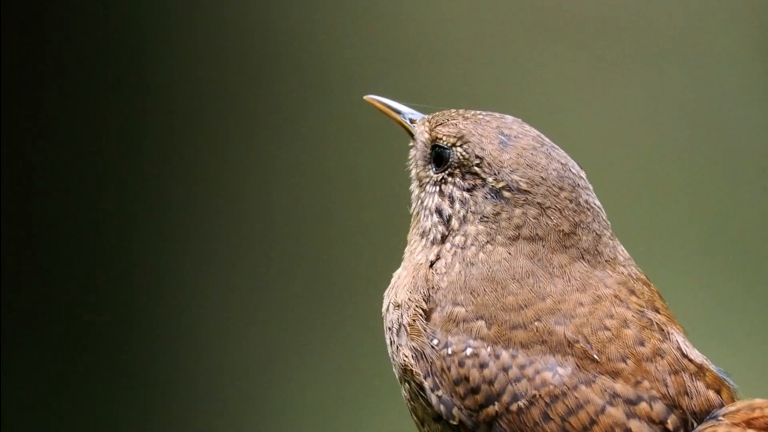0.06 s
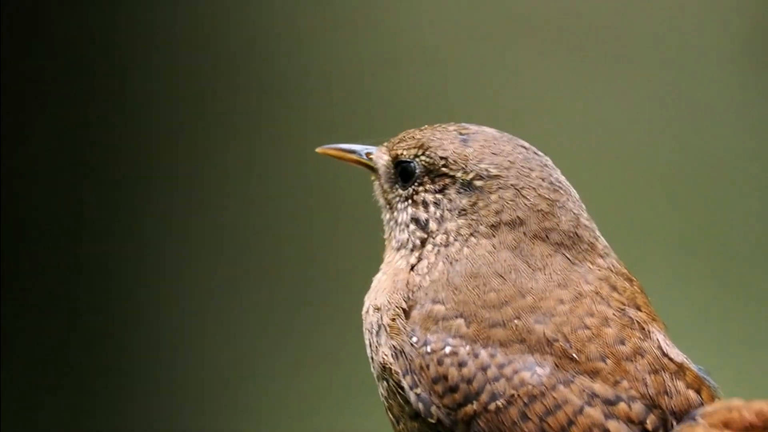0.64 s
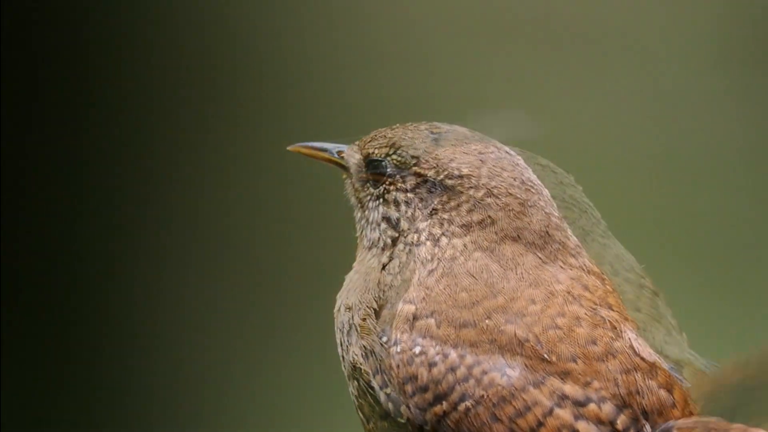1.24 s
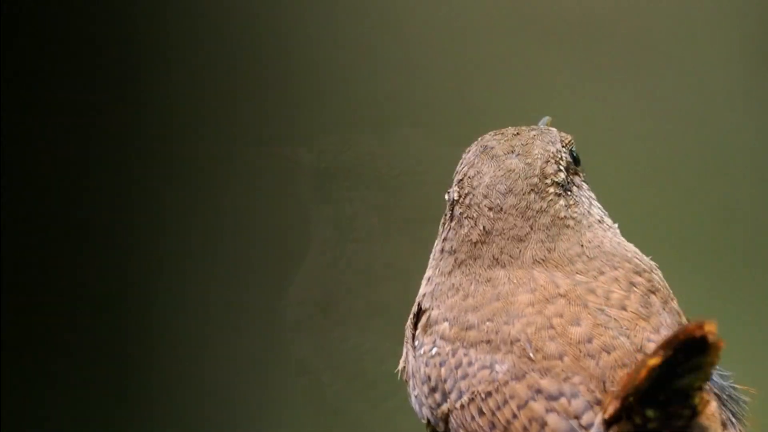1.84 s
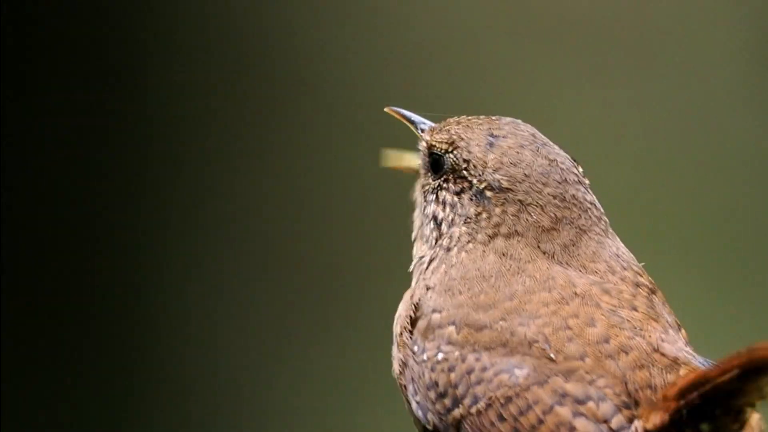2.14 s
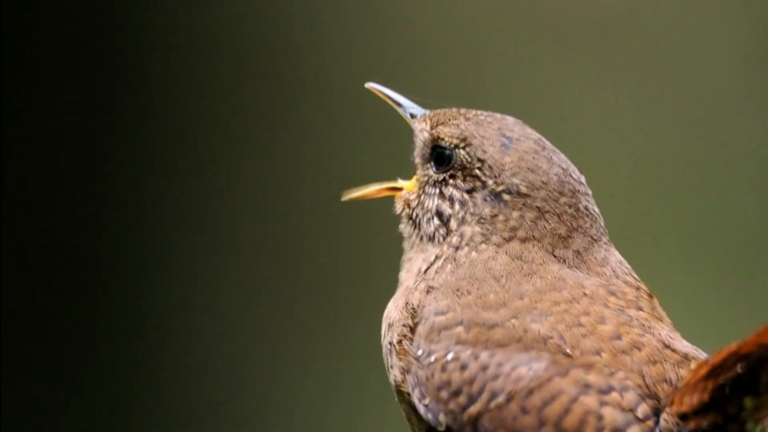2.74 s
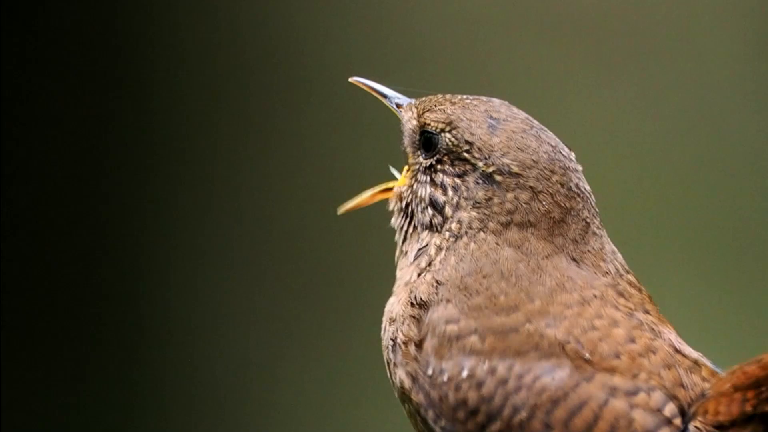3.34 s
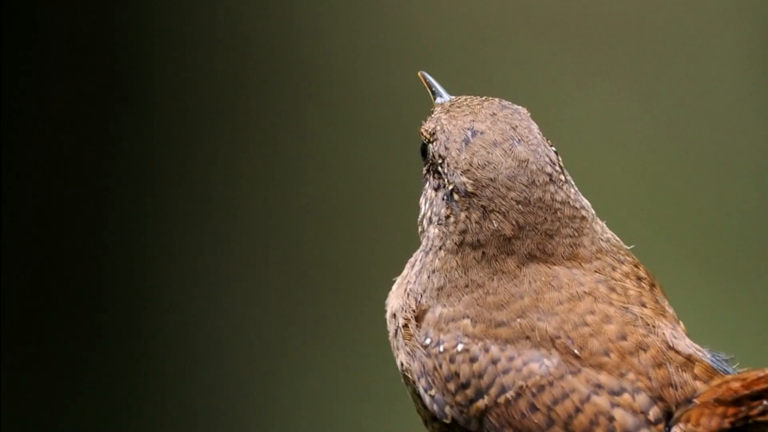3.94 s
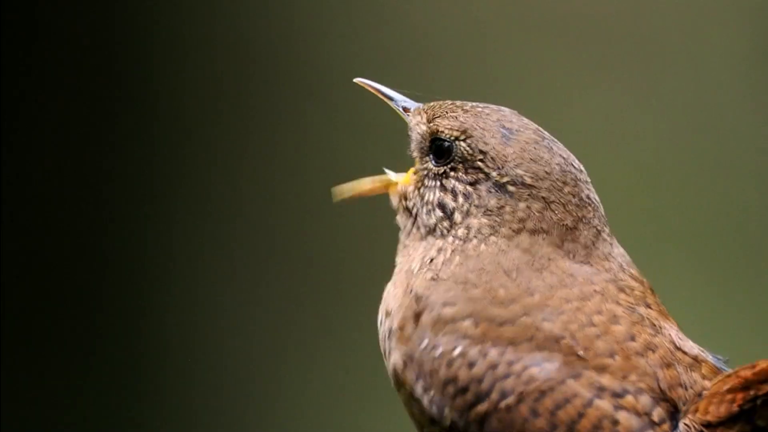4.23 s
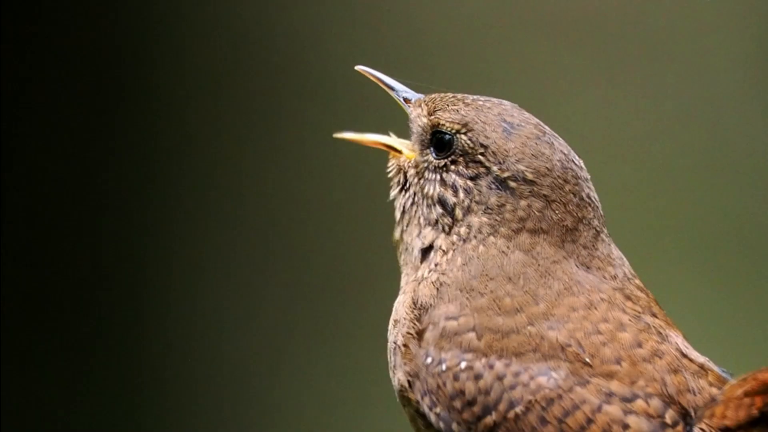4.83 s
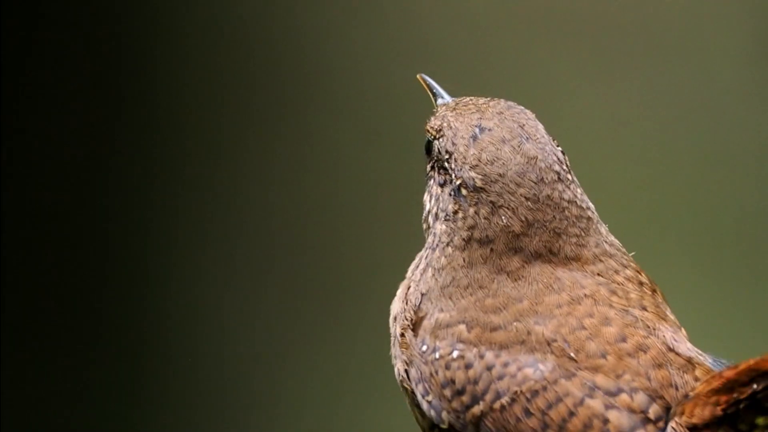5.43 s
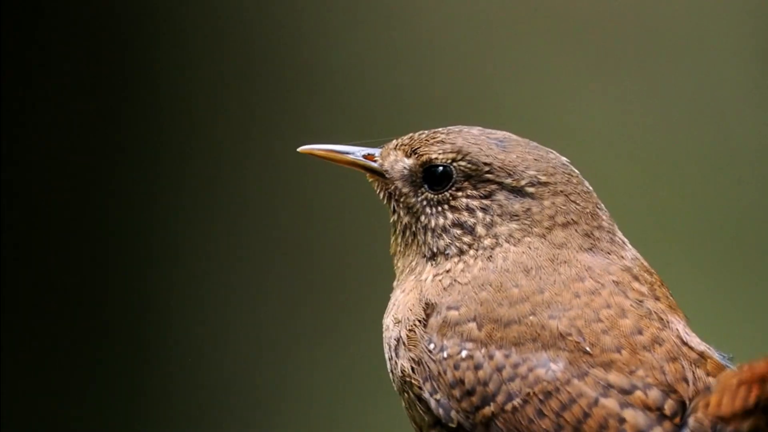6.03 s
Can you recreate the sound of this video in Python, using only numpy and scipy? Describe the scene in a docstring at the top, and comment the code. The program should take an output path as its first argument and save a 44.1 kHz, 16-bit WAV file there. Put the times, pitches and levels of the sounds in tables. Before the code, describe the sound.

A stream rushes steadily in a forest for the whole six seconds, with a light hiss of spray and occasional faint gurgles and ticks of drops. It dips slightly around 1.5 seconds. At about 1.4 seconds a wren close by begins with a few soft, thin, high notes. From 2 seconds its song grows, and from about 2.6 seconds it stands well above the water: a fast, tumbling run of pure whistles, short chips and quick slides up and down. Three longer rising sweeps come between 3.6 and 4.3 seconds, followed by more rapid falling notes and chips. The song ends on a rising whistle at about 5.6 seconds, ringing briefly among the trees. From about 5.4 seconds a second bird further off repeats a faint, short falling note four times, as the stream carries on to the end.

```python
"""A wren close by sings one bout of tumbling whistles in a forest beside a rushing stream.
Each note is a nearly pure, frequency-modulated tone from the syrinx. Trunks return early
reflections, and diffuse scattering keeps the wood ringing for most of a second.
Near the end a second bird repeats a faint downward slur further off. The stream is
broadband noise mixed with resonating air bubbles and the ticks of landing spray."""
import sys
import numpy as np
from scipy import signal
from scipy.fft import rfft, irfft
from scipy.io import wavfile

SR = 44100
rng = np.random.default_rng(int(sys.argv[2]) if len(sys.argv) > 2 else 0)


def transcribe(signal):
    """Save signal, clipped to [-1, 1], as a 16-bit WAV file at the path in sys.argv[1]."""
    frames = np.atleast_2d(signal).T
    limited = np.clip(frames, -1, 1)
    pcm = np.round(limited * 32767).astype(np.int16)
    wavfile.write(sys.argv[1], SR, pcm)


N = 268128
TIME = np.arange(N) / SR
BIN_HZ = np.fft.rfftfreq(N, 1 / SR)


def from_db(db):
    """Amplitude ratio of a level in decibels."""
    return 10 ** (np.asarray(db) / 20)


def unit_rms(x):
    """Normalisation to an rms of 1."""
    return x / np.sqrt(np.mean(x ** 2) + 1e-20)


def over_time(rows):
    """Linear interpolation of each column at every sample."""
    times, *columns = np.transpose(rows)
    return [np.interp(TIME, times, column) for column in columns]


def over_frequency(rows):
    """Interpolation of each column at every bin, on a logarithmic frequency axis."""
    hz, *columns = np.transpose(rows)
    return [np.interp(np.log(BIN_HZ + 1), np.log(hz), column) for column in columns]


def drift(rate_hz, samples):
    """Random modulation: straight lines join Gaussian values drawn at rate_hz."""
    steps = np.arange(samples) * rate_hz / SR
    knots = rng.standard_normal(int(steps[-1]) + 2)
    return np.interp(steps, np.arange(len(knots)), knots)


def bubbles(per_s, size_db, cycles):
    """Damped resonance: bubbles, per_s at each pitch, ring down by 60 dB in `cycles` periods."""
    out = np.zeros(N)
    for hz in np.geomspace(180, 13000, num=36):
        chance, size = rng.random(N), rng.exponential(1, N)
        births = np.flatnonzero(chance < per_s / SR)
        impulses = np.full(N, 1e-18)
        impulses[births] = from_db(size_db * np.minimum(size[births], 4)) * (-1.) ** births
        angle = 2 * np.pi * hz / SR
        radius = from_db(-60 * hz / (cycles * SR))
        ringing = signal.lfilter([1, 0, -1], [1, -2 * radius * np.cos(angle), radius ** 2], impulses)
        out += np.sqrt(hz) * unit_rms(ringing)   # even power per Hz
    return unit_rms(out)


# The stream at the two ears: (frequency [Hz], correlation [-1 to 1], left minus right [dB])
STREAM_WIDTH = [(200, 0.97, 0.1), (900, 0.98, 1), (1510, 0.96, -0.7), (2350, 0.65, -2), (3300, 0.34, 2.5),
                (4500, 0.29, 1), (6000, 0.33, 3), (8200, 0.62, 1.3), (11300, 0.35, -6.5),
                (14000, -0.19, -2.7)]


def water(spectrum, grains, grain_db):
    """Superposition: countless bubbles blur to noise, a few stand out; the ears share the bass."""
    mid, side = rfft(rng.standard_normal((2, N)) + from_db(grain_db) * grains)
    correlation, balance_db = over_frequency(STREAM_WIDTH)
    ears = np.array([[1], [-1]])
    stereo = np.sqrt(1 + correlation) * mid + np.sqrt(1 - correlation) * side * ears
    stereo *= from_db(ears * balance_db / 2) / np.sqrt(1 + np.maximum(correlation, 0))
    colour = from_db(over_frequency(spectrum)[0])
    return unit_rms(irfft(stereo * colour, N))


def splashing(flicker_db, surge_db):
    """Amplitude modulation: water falls unevenly, so quick splashes ride on slower surges."""
    return unit_rms(from_db(flicker_db * drift(180, N) + surge_db * drift(22, N)))


# The largest air pockets in the stream: (time [s], frequency [Hz], relative level [dB])
AIR_POCKETS = [(.543, 1442, -27), (.756, 517, -28), (1.808, 1614, -23), (1.833, 355, -32.5),
               (4.035, 796, -22), (4.206, 850, -29), (4.360, 817, -25)]


def gulps(cycles, rise):
    """Bubble resonance: a large bubble rings down, its pitch climbing as it nears the surface."""
    out = np.zeros(N)
    for start, hz, level_db in AIR_POCKETS:
        at = int(start * SR)
        age = TIME[:min(SR // 5, N - at)] * hz / cycles   # 1 after 60 dB of decay
        envelope = (1 - np.exp(-20 * age)) * from_db(level_db - 60 * age)
        phase = 2 * np.pi * cycles * age * (1 + rise * age)
        out[at:at + len(age)] += 2 * envelope * np.sin(phase)
    return out


# Drops of spray landing: (time [s], relative peak level [dB])
DROP_IMPACTS = [(0.1156, -39), (0.289, -32), (0.379, -32), (1.5838, -35), (1.892, -32), (1.9829, -32),
                (2.391, -30.5), (4.349, -33), (4.3989, -32), (5.9229, -37)]


def drops(decay_s, band_hz, gain_db):
    """Impact transients: each drop is a bright tick of noise with an exponential decay."""
    envelope = sum(from_db(peak_db) * (TIME >= start) * np.exp(-np.abs(TIME - start) / decay_s)
                   for start, peak_db in DROP_IMPACTS)
    band = signal.butter(2, band_hz, "band", fs=SR, output="sos")
    hiss = unit_rms(signal.sosfilt(band, rng.standard_normal((2, N))))
    return from_db(gain_db) * envelope * hiss


# Loudness of the stream's rush and spray, dipping briefly around 1.5 s:
# (time [s], relative rush level [dB], relative spray level [dB])
STREAM_LEVELS = [(0.0, -32, -52), (0.91, -31, -52.5), (0.95, -32.5, -54.5), (1.45, -35, -55.5),
                 (2.01, -31.5, -52.5), (2.17, -32, -52.5), (6.06, -32, -52.5)]
# Spectrum of the falling water: (frequency [Hz], relative spectral density [dB])
RUSH_SPECTRUM = [(15, -43), (25, -10), (49, -9.5), (104, -16), (151, -10), (448, -7), (787, -1), (1010, 0),
                 (1410, -1.5), (1740, -4.5), (2440, -9.5), (2820, -16), (3070, -14.5), (3400, -18),
                 (3700, -22.5), (4810, -57), (8140, -120)]
# Spectrum of the fine spray: (frequency [Hz], relative spectral density [dB])
SPRAY_SPECTRUM = [(2180, -54), (3700, -4), (4310, 2), (5390, -1), (6390, -4.5), (7040, -1), (8050, 0.5),
                  (8820, -2.5), (10100, -10), (11500, -10.5), (13600, -16), (15800, -18.5)]


def stream():
    """Broadband water noise: a gurgling rush around 1 kHz with a hiss of spray above it."""
    rush_db, spray_db = over_time(STREAM_LEVELS)
    gurgle = np.array([bubbles(per_s=45, size_db=3, cycles=24) for _ in range(2)])
    fizz = np.array([bubbles(per_s=60, size_db=5, cycles=10) for _ in range(2)])
    rush_gain = from_db(rush_db + 0.5) * splashing(flicker_db=0.5, surge_db=0.2)
    rush = rush_gain * water(RUSH_SPECTRUM, gurgle, grain_db=-7.5)
    spray_gain = from_db(spray_db + 11.5) * splashing(flicker_db=1.03, surge_db=0.7)
    spray = spray_gain * water(SPRAY_SPECTRUM, fizz, grain_db=-10)
    pockets = gulps(cycles=29, rise=0.05)
    ticks = drops(decay_s=0.0022, band_hz=(7000, 12500), gain_db=-3)
    return rush + spray + pockets + ticks


# Syllable shapes by name: (bow [share of glide], opening snap [share of glide],
# snap time constant [share of note], closing flick [Hz], swell [dB], fade [dB])
SYLLABLE_SHAPES = { "sigh": (0.22, 0, .3, 0, 10, 7), "chip": (0, 0, .3, 0, 10, 14),
                   "slide": (0, 0.13, 0.47, -4, 10.5, 8), "dive": (0.02, 0, .3, 0, 14.5, 4),
                   "plunge": (0, 0.65, 0.23, 0, 8, 5.5), "hook": (.24, 0.26, .3, -2, 19, 6.5),
                   "dip": (.56, 1.98, 0.09, 0, 8, 6), "lift": (0.3, 0, .3, 2, 10, 2.5),
                   "sweep": (-0.2155, 0.47, 0.07, 150, 15, 3), "soar": (0, 0.73, .06, 500, 9.5, 5),
                   "slur": (0.2, 0, .3, 0, 0, 3), }


def contour(t, length, from_hz, to_hz, crest, syllable, flick_s=0.005):
    """Frequency and amplitude modulation: a syllable glides as it swells to a crest and fades."""
    bow, snap, snap_share, flick_hz, swell_db, fade_db = SYLLABLE_SHAPES[syllable]
    progress = t / length
    opening = snap * (1 - np.exp(-progress / snap_share))
    arch = bow * (1 - (2 * progress - 1) ** 2)
    glide = (1 - snap) * progress + opening + arch
    hz = from_hz + (to_hz - from_hz) * glide + flick_hz * np.exp((t - length) / flick_s)
    before_crest = np.interp(progress, [0, crest], [1, 0])
    after_crest = np.interp(progress, [crest, 1], [0, 1])
    return hz, -swell_db * before_crest ** 2 - fade_db * after_crest ** 2


def syrinx(notes, edge_s, waver, flutter_db, octave_db):
    """Nearly sinusoidal oscillation: each note is a trembling glide with a trace of its octave."""
    out = np.zeros(N)
    for start, length, from_hz, to_hz, level_db, crest, syllable in notes:
        t = TIME[TIME < length]
        hz, shape_db = contour(t, length, from_hz, to_hz, crest, syllable)
        hz *= 1 + waver * drift(360, SR)[:len(t)]
        phase = 2 * np.pi * np.cumsum(hz) / SR
        edges = np.sin(np.pi / 2 * np.clip(np.minimum(t, length - t) / edge_s, 0, 1))
        tremble_db = flutter_db * drift(214, SR)[:len(t)]
        envelope = edges * from_db(level_db + shape_db + tremble_db)
        whistle = envelope * (np.sin(phase) + from_db(octave_db) * np.sin(2 * phase))
        at = int(start * SR)
        out[at:at + len(t)] += whistle[:N - at]
    return out


def forest_reverb(x, t60_s, build_s, correlation):
    """Diffuse scattering: echoes from trunks and leaves build up, then decay exponentially."""
    t = TIME[:SR]
    mid, side = rng.standard_normal((2, len(t)))
    scatter = np.sqrt(1 + correlation) * mid + np.sqrt(1 - correlation) * side * [[1], [-1]]
    envelope = (1 - np.exp(-t / build_s)) * from_db(-60 * t / t60_s)
    response = unit_rms(scatter * envelope) / np.sqrt(len(t))
    return signal.fftconvolve(x[None], response, axes=1)[:, :N]


# The distant bird's falling slurs: (time [s], relative level [dB])
FAR_SLURS = [(5.36, -37), (5.576, -38), (5.793, -36), (6.012, -36)]


def far_bird(length_s, from_hz, to_hz):
    """Low direct-to-reverberant ratio: at a distance the scattered sound rivals the direct."""
    notes = [(start, length_s, from_hz, to_hz, level_db, 0.5, "slur") for start, level_db in FAR_SLURS]
    voice = syrinx(notes, edge_s=0.005, waver=0.005, flutter_db=1, octave_db=-50)
    reverb = forest_reverb(voice, t60_s=0.49, build_s=0.0087, correlation=0.3)
    return from_db(-6) * voice + from_db(-2.5) * reverb


# Echoes off nearby trunks: (delay [s], level [dB])
TRUNK_REFLECTIONS = [(0.012, -8.5), (.0205, -22), (.056, -25), (.064, -19.5), (0.079, -17.5)]


def trunk_echoes(x, smear_s):
    """Early reflections: rough bark and branches smear each echo, differently for each ear."""
    t = TIME[:SR // 8]
    response = np.zeros((2, len(t)))
    for delay, level_db in TRUNK_REFLECTIONS:
        burst = rng.standard_normal((2, len(t))) * np.exp(-((t - delay) / smear_s) ** 2)
        response += from_db(level_db) * unit_rms(burst) / np.sqrt(len(t))
    return signal.fftconvolve(x[None], response, axes=1)[:, :N]


# Colouring by reflections close to the perch: (frequency [Hz], gain [dB])
PERCH_RESPONSE = [(3950, 1), (4300, -3.5), (4550, 1), (4950, -2), (5300, 0.5), (5600, 0), (5900, -1),
                  (6300, 1.5), (6750, 1), (6880, -4), (7020, 1.5), (7350, -3.5), (7750, 1.5)]
# The perch at two microphone ports: (frequency [Hz], left minus right [dB], left phase lead [rad])
PORT_RESPONSE = [(4040, 0, 1.1), (4200, 3.5, -0.7), (4700, -4, -0.9), (5250, -5, -1.3), (5600, -2, 1.3),
                 (6100, 1, 0.2), (6750, 8, -2), (6840, -12, -2), (7000, 7, -0.85), (7430, -3, -2)]


def direct_path(x):
    """Interference near the perch makes glides swell unevenly; balance and lag vary with pitch."""
    colour = from_db(over_frequency(PERCH_RESPONSE)[0])
    balance_db, lead = over_frequency(PORT_RESPONSE)
    left = from_db(balance_db / 2) * np.exp(0.5j * lead)
    return irfft(rfft(x) * colour * np.array([left, 1 / left]), N)


# The wren's notes: (time [s], duration [s], glide origin [Hz], glide target [Hz],
# relative level [dB], crest position [share of note], syllable [name])
WREN_SONG = [ (1.412, 0.097, 5450, 5310, -35.5, 0.8, "sigh"), (1.576, .014, 4490, 4310, -37, .4, "chip"),
             (1.630, .020, 4500, 4310, -35.5, 0.5, "chip"), (1.718, 0.13, 6680, 6500, -32, 0.8, "sigh"),
             (1.902, 0.11, 7130, 6680, -31, 0.44, "sigh"), (2.043, 0.044, 5950, 5080, -19.5, 0.43, "hook"),
             (2.119, .021, 4570, 3990, -25.5, 0.6, "chip"), (2.179, .047, 4290, 5060, -20, .5, "sweep"),
             (2.233, 0.04, 5660, 6360, -32.5, 0.1, "lift"), (2.317, 0.039, 6490, 3820, -21, 0.47, "dive"),
             (2.422, 0.19, 7140, 7610, -27, 0.56, "soar"), (2.645, 0.072, 5530, 3940, -15, 0.25, "slide"),
             (2.771, 0.061, 7330, 5140, -13, 0.7, "hook"), (2.863, 0.025, 4470, 3790, -19.5, .6, "chip"),
             (2.911, 0.014, 4800, 5670, -17, .7, "lift"), (2.949, 0.042, 6600, 3950, -15.5, 0.37, "plunge"),
             (3.030, 0.062, 5440, 6500, -16, 0.4, "sweep"), (3.135, 0.053, 7500, 5140, -11.5, 0.77, "hook"),
             (3.234, 0.064, 5200, 6540, -16, 0.3, "sweep"), (3.345, 0.055, 7120, 5130, -12, 0.58, "hook"),
             (3.439, 0.066, 4100, 4470, -13.5, .82, "lift"), (3.569, 0.032, 8040, 7790, -20.5, .45, "dip"),
             (3.641, 0.15, 6350, 7780, -16.5, 0.5, "sweep"), (3.855, 0.16, 6205, 7710, -17, 0.58, "sweep"),
             (4.083, .162, 6240, 7700, -17.5, 0.54, "sweep"),
             (4.306, 0.095, 5446, 4240, -13, 0.14, "slide"), (4.473, 0.0203, 6870, 7620, -25, .7, "lift"),
             (4.501, 0.041, 6420, 4420, -14, 0.56, "dive"), (4.553, 0.049, 6960, 6340, -15.5, .38, "dip"),
             (4.648, .064, 5300, 3970, -14, 0.33, "slide"), (4.760, .047, 4920, 4993, -16, 0.1, "lift"),
             (4.834, .021, 4290, 3800, -16.5, 0.46, "chip"), (4.884, 0.023, 4170, 3690, -20, .45, "chip"),
             (4.934, 0.015, 4220, 5300, -14.5, 0.8, "lift"), (4.972, .050, 6220, 3804, -15, 0.37, "plunge"),
             (5.087, 0.15, 7800, 5900, -17.5, 0.42, "sigh"), (5.299, 0.022, 4260, 3620, -22, .42, "chip"),
             (5.355, 0.02, 4070, 3610, -21.5, 0.26, "chip"), (5.424, 0.15, 5200, 7310, -16, 0.83, "soar"), ]


def wren():
    """Multipath propagation: the near song arrives directly, off trunks and as reverberation."""
    voice = syrinx(WREN_SONG, edge_s=0.0035, waver=0.0031, flutter_db=1.58, octave_db=-50)
    echoes = trunk_echoes(voice, smear_s=0.0078)
    reverb = forest_reverb(voice, t60_s=0.86, build_s=0.016, correlation=0.2)
    return from_db(-0.7) * direct_path(voice) + echoes + from_db(-10) * reverb


def scene():
    """Linear superposition: the pressures from two birds and the stream add."""
    return wren() + far_bird(length_s=0.036, from_hz=5220, to_hz=4170) + stream()


def record(dry):
    """Band limiting: a steep elliptic low-pass removes the treble above 15.7 kHz."""
    return signal.sosfilt(signal.ellip(12, 0.1, 90, 15700, fs=SR, output="sos"), dry)


dry = scene()
out = record(dry)
transcribe(out)
```